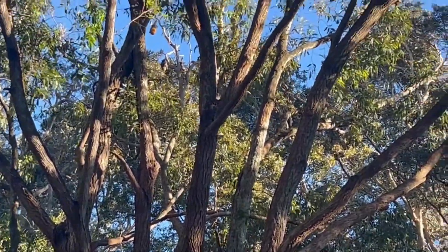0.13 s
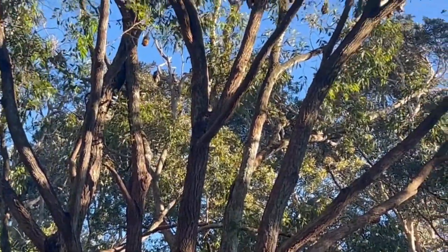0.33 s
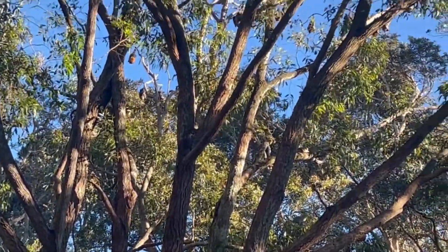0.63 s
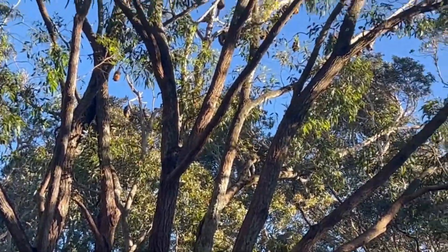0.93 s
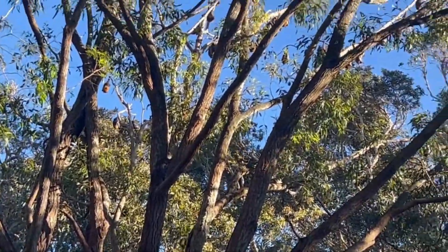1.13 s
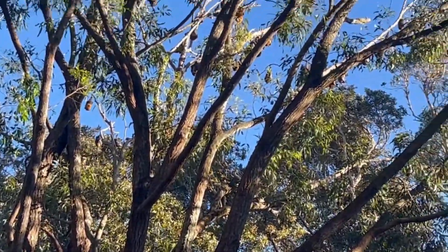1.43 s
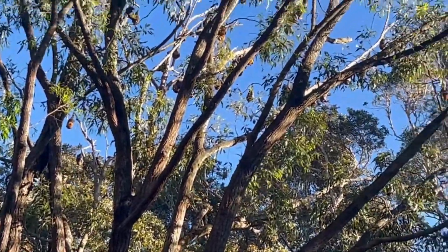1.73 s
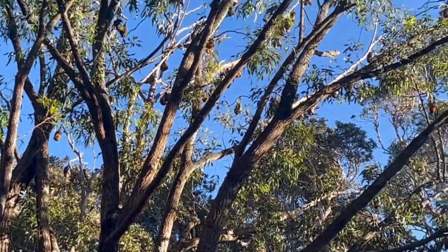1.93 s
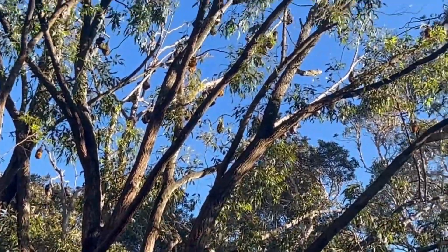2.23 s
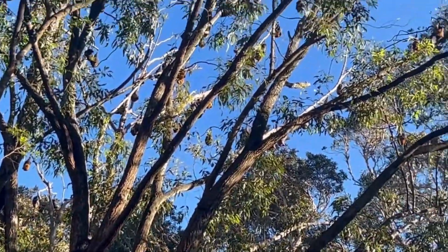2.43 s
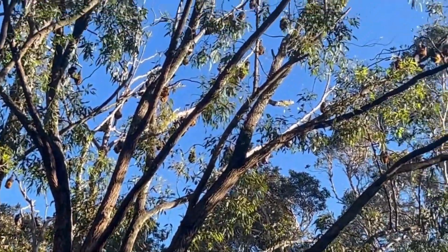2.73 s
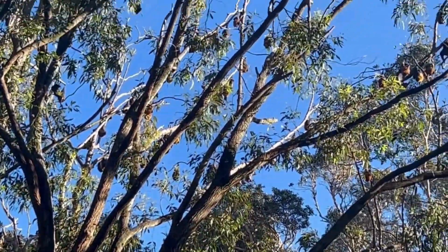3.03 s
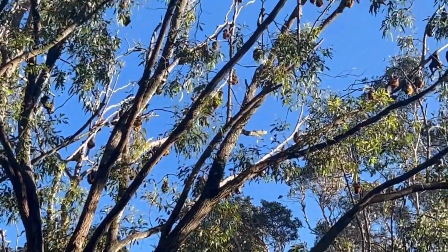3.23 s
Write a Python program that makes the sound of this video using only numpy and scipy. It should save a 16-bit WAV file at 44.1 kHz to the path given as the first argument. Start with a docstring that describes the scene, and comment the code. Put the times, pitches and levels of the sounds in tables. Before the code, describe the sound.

Fruit bats squabble high in tall trees. Nearby ones rattle, chuck and squeal, give one harsh screech, then carry on with short calls. The rest of the colony chatters far off over a low rumble of traffic and wind.

```python
"""High in tall trees, a colony of fruit bats squabbles. Near animals rattle, chuck, squeal and give one
long harsh screech, each call a buzz of vocal folds and breath shaped by the throat and mouth. The rest of
the colony chatters far off. Trunks and leaves scatter the near calls over a low rumble of distant traffic
and wind, and a faint drone swells once."""
import sys
import numpy as np
from scipy import signal
from scipy.fft import rfft, irfft, next_fast_len
from scipy.io import wavfile

SR = 44100
rng = np.random.default_rng(int(sys.argv[2]) if len(sys.argv) > 2 else 0)


def wav_out(sig):
    """Save sig, one row per channel (or a flat mono array), as 16-bit PCM at SR to the path in sys.argv[1]."""
    wavfile.write(sys.argv[1], SR, np.round(np.clip(np.atleast_2d(sig).T, -1, 1) * 32767).astype(np.int16))


N = 148617
TOP_HZ, TREBLE_KNEE_HZ = 15700, 4380

# The screech's swell: time_s, level_db
SCREECH_LEVEL = [(.8, -51), (.87, -51.5), (.95, -45), (1.14, -43), (1.23, -43), (1.29, -45.5), (1.34, -58)]
# Its sinking pitch line, before the break lowers it: time_s, pitch_hz
SCREECH_GLIDE = [(.8, 518.3), (.96, 464.6), (1.06, 458), (1.2, 467.2), (1.34, 430.7)]
# Its colour at the onset: freq_hz, gain_db
MOUTH_NARROW = [(1300, -29), (1850, -0.5), (2330, 3), (2750, -3.5), (3700, -3), (4550, -9.5), (5800, -26),
                (7300, -20), (15000, -41)]
# Its colour with the mouth wide open: freq_hz, gain_db
MOUTH_WIDE = [(1300, -23), (1900, 1.5), (2330, 9), (3000, -10.5), (3850, -3.5), (5200, -13), (8000, -12),
              (9700, -26), (11300, -22), (15000, -40)]
OPEN_FROM_S, OPEN_TO_S, BREAK_RATIO = 0.99, 1.27, 0.838
WAVER, WAVER_HZ, RASP, RASP_HZ = 0.0117, 24, 0.25, 131

def screech():
    """A long rasping call; as the mouth opens it crossfades to a brighter voice at a lower pitch."""
    t = np.arange(N) / SR
    on = (t > SCREECH_LEVEL[0][0]) & (t < SCREECH_LEVEL[-1][0])
    hz = (curve(SCREECH_GLIDE) * (1 + WAVER * wander(N, WAVER_HZ)))[on]
    narrow, wide = (colour(folds(pitch, jitter=0.012, hiss=0.98, slope=0), mouth)
                    for pitch, mouth in ((hz, MOUTH_NARROW), (hz * BREAK_RATIO, MOUTH_WIDE)))
    opening = curve([(OPEN_FROM_S, 0), (OPEN_TO_S, 1)])[on]
    call = np.zeros(N)
    call[on] = np.sqrt(1 - opening) * narrow + np.sqrt(opening) * wide
    rasp = unit(np.exp(RASP * np.tanh(wander(N, RASP_HZ))))
    return call * amp(curve(SCREECH_LEVEL)) * rasp


# Squeals, mostly from near bats; the faint, long rows at 2.053 s and 2.345 s are a more distant bat: start_s,
# length_s, first_hz, middle_hz, last_hz, level_db, treble_db, roughness
SQUEAL_CUES = [(0.005, 0.062, 3320, 3250, 2970, -55, -3, 0.4),
               (0.415, 0.038, 3420, 3560, 3460, -47, -1, 0.5),
               (0.569, 0.032, 2400, 2510, 2700, -47.5, -22, 0.6),
               (0.588, 0.049, 3060, 3385, 3670, -43.5, -12, 1.23),
               (0.615, 0.038, 1870, 1860, 1950, -47, 13.5, 0.24),
               (0.853, 0.075, 2706, 2880, 2770, -45, -8, 0.99),
               (1.303, 0.13, 860, 1055, 908, -48, -8, 0.08),
               (1.31, 0.042, 1760, 1883, 2010, -42.5, 0.5, 0.34),
               (1.41, 0.05, 1894, 2154, 2300, -40, -1, 1.1),
               (1.772, 0.046, 2326, 2250, 2300, -50, 3.5, .65),
               (1.927, 0.053, 2684, 2755, 2735, -48.5, 3, 0.48),
               (2.053, 0.28, 2055, 2240, 2296, -56.5, -13, 0.7),
               (2.345, 0.13, 2400, 2446, 2440, -55, -24, 0.28),
               (2.597, 0.069, 1037, 1127, 920, -50, 18, 0.17),
               (2.744, 0.0376, 1240, 1300, 1194, -50.5, 25, 0.26),
               (2.879, 0.029, 3280, 3410, 3370, -54, -12, 0.1),
               (2.964, 0.05, 564, 588.4, 580, -45, 3, 0.52), (3.036, 0.067, 2520, 2547, 2730, -49, 2, 0.5),
               (3.113, 0.053, 3040, 3447, 3194, -41.5, -6, 0.31),
               (3.167, 0.034, 1583, 1420, 1070, -52.5, 5, 0.14),
               (3.244, 0.027, 1924, 2180, 2270, -47.5, 9, 0.64),
               (3.267, 0.019, 1680, 1345, 1130, -47, 6, 0.3)]
QUAVER, QUAVER_HZ, SQUEAL_TOP_HZ = 0.61, 157, 12500

def squeal(start, length, first_hz, middle_hz, last_hz, db, treble_db, rough):
    """A quavering call whose pitch bends along an arc; its top overtones are soft."""
    u = np.linspace(0, 1, int(length * SR))
    hz = np.polyval(np.polyfit([0, .5, 1], [first_hz, middle_hz, last_hz], 2), u)
    quaver = unit(np.exp(QUAVER * np.tanh(wander(len(u), QUAVER_HZ))))
    tone = voice(hz, treble_db, rough, slope=0.58)
    softened = signal.lfilter(*signal.butter(3, SQUEAL_TOP_HZ, fs=SR), tone)
    return start, amp(db) * quaver * arch(u) ** 0.57 * softened


# Sharp single accents: start_s, length_s, pitch_hz, level_db, treble_db
CHUCK_CUES = [(0.358, 0.015, 2200, -39, -3), (0.395, 0.013, 2256, -39, -3),
              (0.414, 0.01, 2345, -32.5, -7.5), (.627, 0.017, 2240, -35.5, -20),
              (.641, 0.015, 2245, -27.5, -36), (0.654, 0.017, 2222, -30, -49),
              (0.757, 0.015, 1950, -43.5, 3), (0.84, 0.0092, 2110, -45, 19), (1.454, 0.016, 1979, -36, 2.5),
              (1.469, 0.0087, 2044, -33.5, 1), (1.485, 0.017, 1825, -47.5, 27),
              (1.548, 0.018, 1972, -44, 0), (2.408, 0.02, 4030, -51.5, -16.5),
              (3.243, 0.0092, 2013, -42.5, 1)]

def chuck(start, length, hz, db, treble_db):
    """One forceful burst of voice."""
    return start, burst(length, hz, db, treble_db, rough=0.35)


# Near rattles: start_s, length_s, pulses_per_s, pitch_hz, level_db, treble_db
RATTLE_CUES = [(0.112, .088, 79, 2570, -53.5, 3), (0.201, .135, 74.5, 2814, -46.5, -1),
               (0.346, .046, 81, 1940, -45, 8.5), (0.615, .085, 132, 2204, -45, 5.5),
               (1.479, .1, 84, 1898, -44.5, -6.5), (1.617, .09, 48, 1793, -45, -8),
               (2.024, .085, 48, 4780, -49.5, -20), (2.144, .045, 60, 4110, -49, -20)]
PULSE_S, PULSE_SLIP_S = 0.0081, 0.00041

def rattle(start, length, rate, hz, db, treble_db):
    """A quick run of bursts, each a little different in timing, pitch, strength and colour."""
    run = np.zeros(int((length + 2 * PULSE_S) * SR))
    variations = noise(400).reshape(-1, 4)
    for s, (slip, pitch, force, bright) in zip(np.arange(0, length, 1 / rate), variations):
        pulse = burst(PULSE_S, hz * (1 + .08 * pitch), db + 2 * force, treble_db + 2.5 * bright, rough=.6)
        add(run, s + PULSE_SLIP_S * slip, pulse)
    return start, run


def burst(length, hz, db, treble_db, rough):
    """A few milliseconds of voice with a quick attack."""
    u = np.linspace(0, 1, int(length * SR))
    return amp(db) * arch(u, skew=0.76) ** 2 * voice(np.full(len(u), hz), treble_db, rough)


# Formants of a bat's throat: freq_hz, gain_db
THROAT_EQ = [(500, -37), (1050, -6), (1500, -2.5), (2150, 2.5), (3100, -3.5), (4300, -15.5), (6100, -4),
             (7300, -15.5), (8400, -9), (9700, -18), (11300, -15), (15500, -27)]

def voice(hz, treble_db, rough, slope=0):
    """The folds heard through the throat; in low calls the treble starts above the second harmonic."""
    buzz = folds(hz, jitter=0.0685 * rough, hiss=0.4 * rough, slope=slope)
    return colour(buzz, THROAT_EQ, treble_db, knee_hz=min(TREBLE_KNEE_HZ, 2 * hz.mean()))


def folds(hz, jitter, hiss, slope):
    """Vocal folds: harmonics on an unsteady pitch, plus breath noise; slope darkens both."""
    unsteady_hz = hz * (1 + jitter * wander(len(hz), hz=663))
    phase = 2 * np.pi * np.cumsum(unsteady_hz) / SR
    span = TOP_HZ / hz.mean()
    harmonics = sum(np.cos(k * phase) / k ** slope for k in range(1, int(span) + 1))
    breath = colour(noise(len(hz)), [(hz.mean(), 0), (TOP_HZ, -20 * slope * np.log10(span))])
    return unit(harmonics) + hiss * breath


# Stereo placement of the near bats: freq_hz, left_lead_rad, left_minus_right_db
NEAR_IMAGE = [(1010, 0.32, -1), (1610, 1.76, -11), (2300, 0.54, -1.5), (3660, 0.31, 0)]

def microphones(x):
    """Direct sound differs in phase and level between the two microphones, most in the midrange."""
    size, image = next_fast_len(N), np.array(NEAR_IMAGE)
    hz = np.fft.rfftfreq(size, 1 / SR)
    side = np.array([[.5], [-.5]])
    lead_rad, balance_db = at_hz(image[:, :2], hz), at_hz(image[:, ::2], hz)
    return irfft(rfft(x, size) * np.exp(1j * side * lead_rad) * amp(side * balance_db), size)[:, :N]


# Reverb decay among the trees: freq_hz, t60_s
TREE_DECAY = [(500, 0.96), (2200, 0.63), (6000, 0.6)]
ECHO_ATTACK_S = 0.0043

def trees(x):
    """Echoes from trunks and leaves; the treble dies first."""
    hz, t, spectrum = signal.stft(spread(rng.standard_normal((2, SR))), SR, nperseg=256)
    decay = amp(-60 * t / at_hz(TREE_DECAY, hz)[:, None])
    attack = np.minimum(t / ECHO_ATTACK_S, 1)
    tail = signal.istft(spectrum * decay * attack, SR)[1]
    return signal.fftconvolve(x[None], tail / np.linalg.norm(tail[0]), axes=1)[:, :N]


# Tone of the far chatter: freq_hz, gain_db
CHATTER_EQ = [(600, 6), (1100, -3), (2400, 0), (4100, 0), (6500, -7), (9500, -16.5), (15500, -25)]
# Its surges and lulls: time_s, level_db
CHATTER_LEVEL = [(0, -56), (.35, -51), (.55, -56.5), (1.6, -50.5), (1.9, -56), (2.6, -55.5), (3.1, -51.5)]
FAR_CALLS_PER_S, FAR_WASH = 70, 1.31

def colony():
    """Many far calls, two squeals to each rattle, melt into a wash of noise."""
    calls, count = np.zeros((2, N)), int(FAR_CALLS_PER_S * N / SR)
    for k, (when, size, pitch, style) in enumerate(rng.random((count, 4))):
        start, length = (k + when) / FAR_CALLS_PER_S, 0.0199 + .07 * size
        hz, db = 1700 + 1200 * pitch, 0.5 * rng.standard_normal()
        if k % 3:
            call = squeal(start, length, hz, hz * (.95 + .1 * style), hz, db, treble_db=0, rough=0.735)
        else:
            call = rattle(start, length, 60 + 50 * style, hz, db, treble_db=0)
        add(calls[k % 2], *call)
    flattened = colour(calls, [(hz, -db) for hz, db in THROAT_EQ[1:]])  # evens out the formants
    wash = spread(flattened + FAR_WASH * rng.standard_normal((2, N)))
    return colour(wash, CHATTER_EQ) * amp(curve(CHATTER_LEVEL))


# Bass-heavy bed of traffic and wind: freq_hz, gain_db
RUMBLE_EQ = [(18, -56), (31, -10), (44, 0), (68, -0.5), (100, -7.5), (210, -21.5), (500, -32.5),
             (800, -41.5), (1400, -39.5), (16000, -79)]
# Its slow swell: time_s, level_db
RUMBLE_SWELL = [(0, -37.5), (.4, -36), (2.35, -36.5), (2.6, -38), (3.37, -39)]

def rumble():
    """Distant traffic and wind, swelling gently."""
    return colour(spread(rng.standard_normal((2, N))), RUMBLE_EQ) * amp(curve(RUMBLE_SWELL))


# Dark tone of the drone: freq_hz, gain_db
DRONE_EQ = [(180, -4), (260, -15), (320, 1), (490, -12), (1800, -84)]
DRONE_START_S, DRONE_LENGTH_S, DRONE_DB = 0.17, 0.62, -49

def drone():
    """A faint, far drone of low noise swells and fades once."""
    swell = arch((np.arange(N) / SR - DRONE_START_S) / DRONE_LENGTH_S)
    return amp(DRONE_DB) * swell * colour(spread(rng.standard_normal((2, N))), DRONE_EQ)


# Stereo width of echoes and background: freq_hz, coherence (0 wide, 1 mono)
AMBIENCE_IMAGE = [(30, 1), (270, 0.88), (500, 0.74), (1200, 0.014), (2300, 0.79), (5000, 0.96)]

def spread(pair):
    """Makes two unrelated signals as alike as the microphones hear them."""
    a, b = rfft(pair)
    coherence = np.clip(at_hz(AMBIENCE_IMAGE, np.fft.rfftfreq(pair.shape[1], 1 / SR)), -1, 1)
    mid, side = a * np.sqrt((1 + coherence) / 2), b * np.sqrt((1 - coherence) / 2)
    return irfft(np.array([mid + side, mid - side]), pair.shape[1])


def colour(x, eq, treble_db=0, knee_hz=TREBLE_KNEE_HZ):
    """Applies an EQ curve and a treble shelf above a knee; rms 1."""
    n = x.shape[-1]
    size = next_fast_len(n)
    hz = np.fft.rfftfreq(size, 1 / SR)
    shelf = at_hz([(knee_hz, 0), (knee_hz * 1.2, 1)], hz)
    gain = amp(at_hz(eq, hz) + treble_db * shelf)
    return unit(irfft(rfft(x, size) * gain, size)[..., :n])


def arch(u, skew=1):
    """Swells and fades as u runs from 0 to 1; a small skew gives a quick attack."""
    return abs(np.sin(np.pi * np.clip(u, 0, 1) ** skew))


def wander(n, hz):
    """Smooth random motion up to a rate; rms 1."""
    return unit(signal.lfilter(*signal.butter(2, hz, fs=SR), noise(n + SR // 20))[-n:])


def noise(n):
    """Fresh white noise."""
    return np.random.default_rng(rng.integers(2 ** 31)).standard_normal(n)


def amp(db):
    """Decibels to gain."""
    return 10 ** (np.asarray(db) / 20)


def unit(x):
    """Scales to rms 1."""
    return x / np.sqrt(np.mean(x ** 2) + 1e-20)


def at_hz(points, hz):
    """Reads a curve on a log-frequency axis."""
    f, value = np.transpose(points)
    return np.interp(np.log(hz + 1), np.log(f + 1), value)


def curve(points):
    """Reads an automation curve at every sample."""
    return np.interp(np.arange(N) / SR, *np.transpose(points))


def add(mix, start_s, sound):
    """Mixes a sound in at its cue."""
    part = mix[max(round(start_s * SR), 0):][:len(sound)]
    part += sound[:len(part)]


CALLS_SEND_DB, SCREECH_SEND_DB = -4.5, -5

def scene():
    """Near bats and their echoes over the far colony, the rumble and the drone."""
    short_calls, long_call = np.zeros(N), screech()
    for call, cues in ((rattle, RATTLE_CUES), (chuck, CHUCK_CUES), (squeal, SQUEAL_CUES)):
        for cue in cues:
            add(short_calls, *call(*cue))
    echoes = trees(amp(CALLS_SEND_DB) * short_calls + amp(SCREECH_SEND_DB) * long_call)
    return microphones(short_calls + long_call) + echoes + colony() + rumble() + drone()


def record(dry):
    """The recorder's band limit: a steep low-pass."""
    lowpass = signal.firwin(511, TOP_HZ, window=("kaiser", 9), fs=SR)
    return signal.oaconvolve(dry, lowpass[None], "same")


dry = scene()
out = record(dry)
wav_out(out)
```